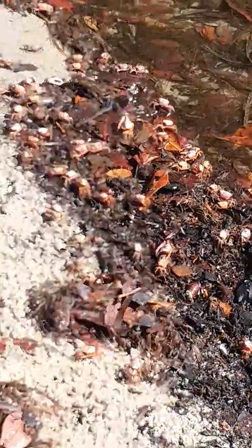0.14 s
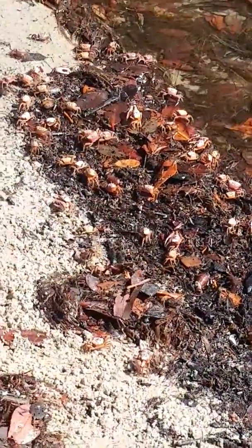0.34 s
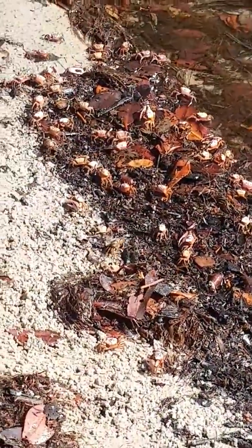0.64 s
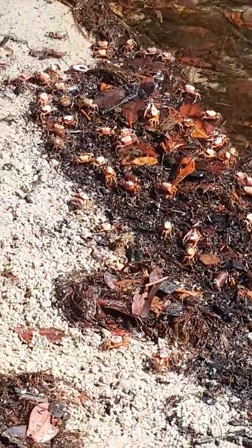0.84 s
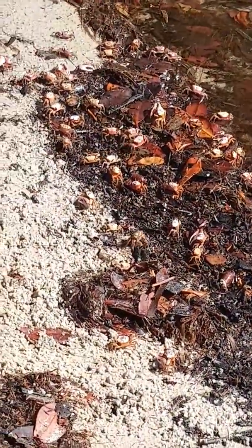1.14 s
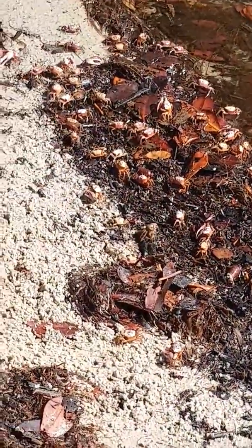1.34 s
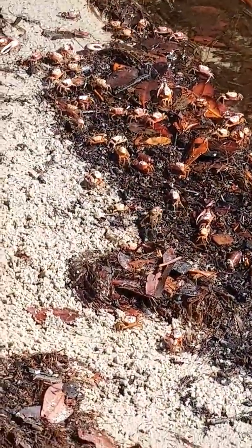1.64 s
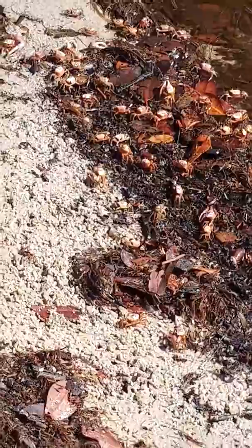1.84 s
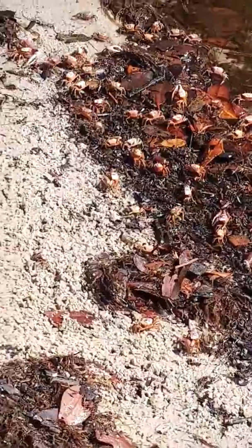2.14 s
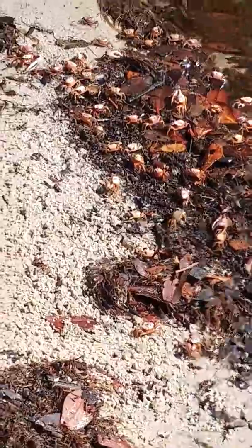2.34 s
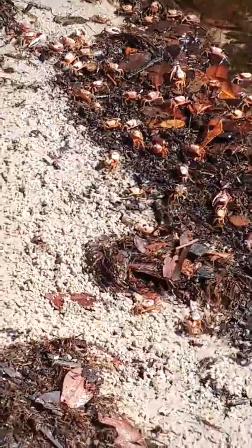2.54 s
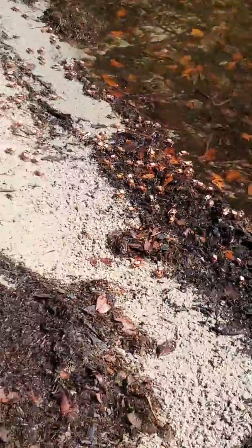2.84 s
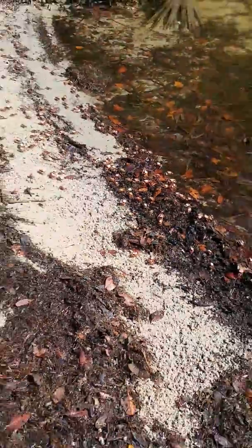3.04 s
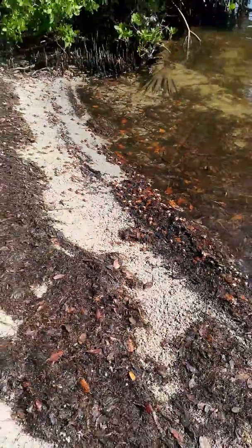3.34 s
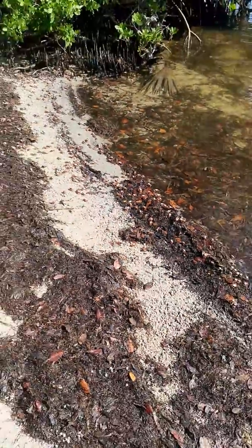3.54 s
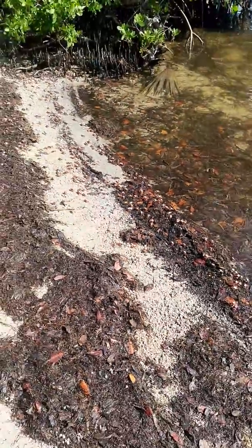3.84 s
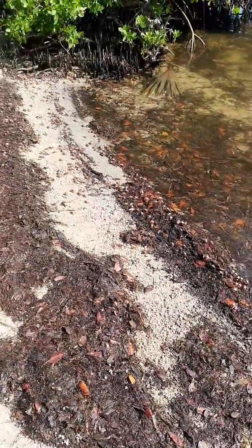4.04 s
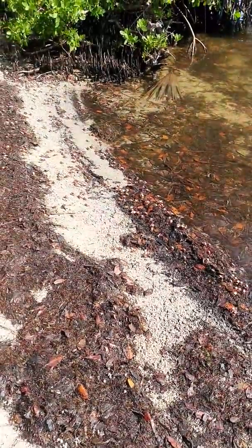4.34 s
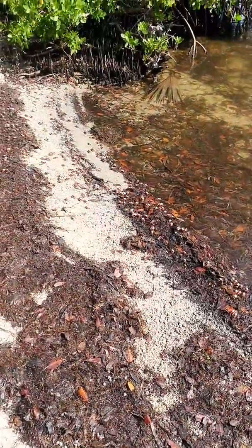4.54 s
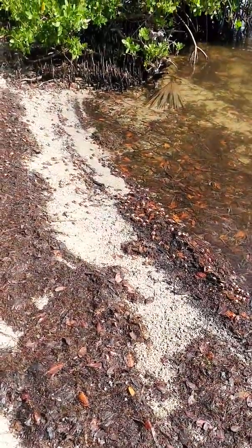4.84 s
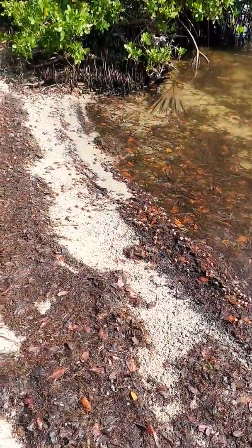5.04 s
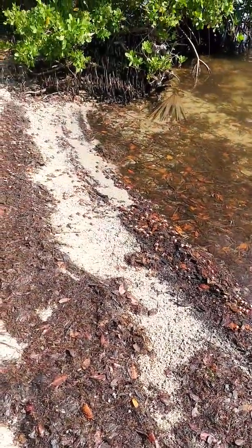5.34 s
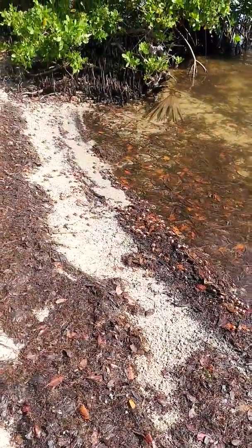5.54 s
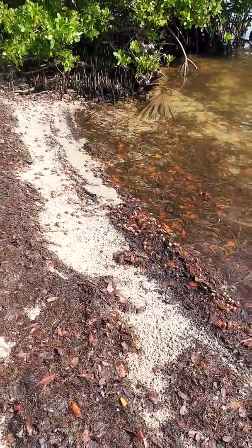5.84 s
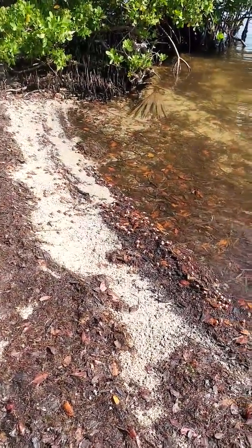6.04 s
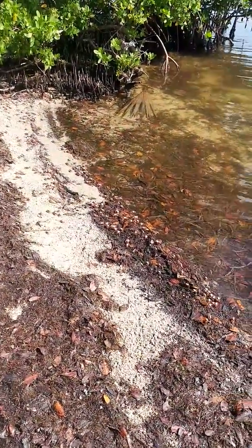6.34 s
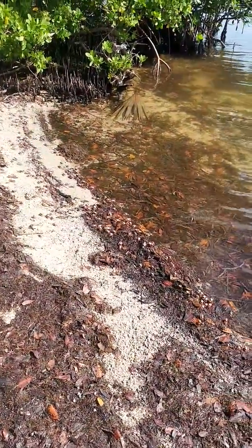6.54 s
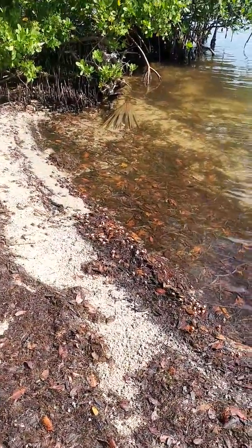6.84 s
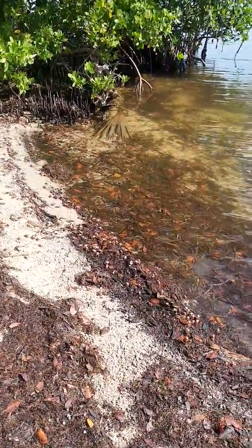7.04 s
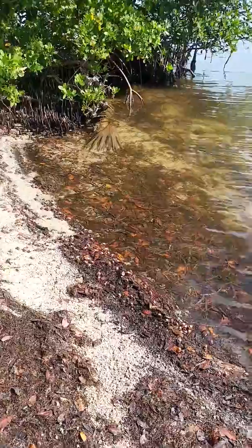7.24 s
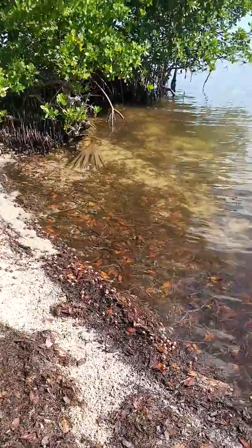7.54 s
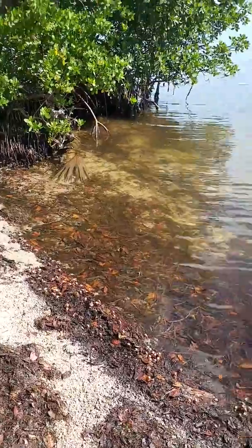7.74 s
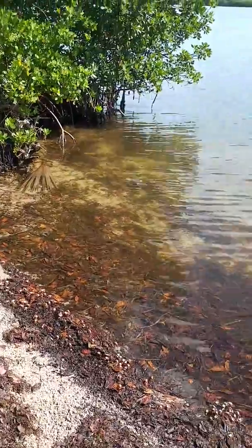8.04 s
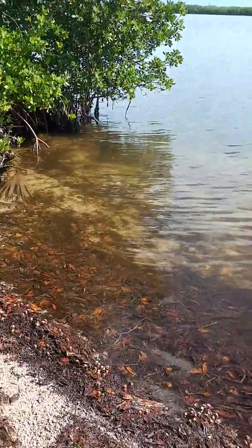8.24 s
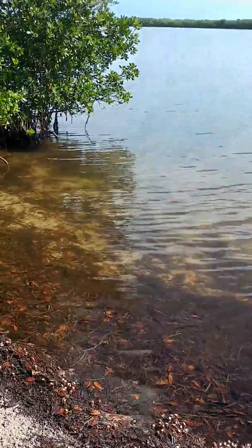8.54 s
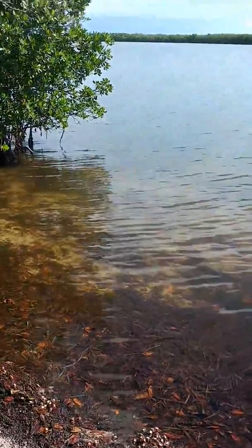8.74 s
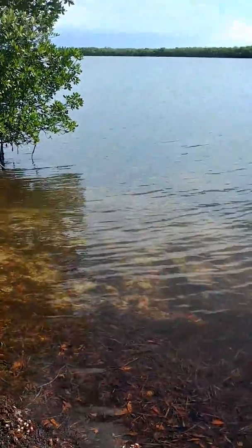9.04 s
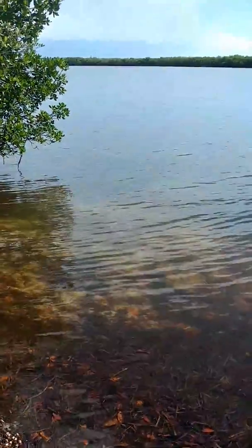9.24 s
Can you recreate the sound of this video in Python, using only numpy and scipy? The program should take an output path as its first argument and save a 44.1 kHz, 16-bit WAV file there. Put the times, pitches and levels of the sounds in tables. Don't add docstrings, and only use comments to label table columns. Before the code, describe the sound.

On a mangrove shore beside a calm lagoon, a hand-held phone picks up continuous shrill cicada song for about 9.4 seconds. The closest singer makes a dense, dry buzz of roughly 108 pulses a second, ringing around 8 kHz with a brighter edge near 10 kHz, its tone shifting slightly. Brief dropouts under a tenth of a second come at 3.3, 4.1, 7.1 and 7.9. A second, slower-pulsing cicada and a far crowd blur into hiss behind. Wind slaps the left side at the very start, then buffets both sides until about 2.9, with another thump near 2.1. The middle is calm, with a faint low distant hum. A hard left gust hits at 7.05, and lumpy gusts, stronger on the right, run from 7.6 to the end. Tiny water laps fizz almost inaudibly at 6.9 on the left and 8.4 on the right.

```python
import sys
import numpy as np
from scipy import signal
from scipy.fft import rfft, irfft, next_fast_len
from scipy.io import wavfile
from scipy.ndimage import uniform_filter1d

SR = 44100
rng = np.random.default_rng(int(sys.argv[2]) if len(sys.argv) > 2 else 0)


def wrap_up_sound(samples):
    columns = np.atleast_2d(samples).T
    tamed = np.clip(columns, -1, 1)
    steps = np.round(tamed * 32767).astype(np.int16)
    wavfile.write(sys.argv[1], SR, steps)


def boost_factor(decibels):
    exponent = np.asarray(decibels, float) / 20
    return 10 ** exponent


N = 413658


def evened(x):
    return x / np.sqrt(np.mean(x ** 2) + 1e-20)


def curves(rows):
    s, *columns = np.transpose(rows)
    return [np.interp(np.arange(N) / SR, s, column) for column in columns]


def read(points, hz, axis=1):
    table = np.transpose(points)
    return np.interp(np.log(hz + 1), np.log(table[0] + 1), table[axis])


def drift(rate_hz, count=1):
    t = np.arange(0, N + 64, 64) / SR
    hz = np.geomspace(rate_hz / 12, rate_hz, 16)
    phase_turns = hz[:, None] * t + rng.random((count, 16, 1))
    slow = np.sin(2 * np.pi * phase_turns).sum(1) / np.sqrt(8)
    return np.array([np.interp(np.arange(N) / SR, t, row) for row in slow])


def coloured(x, db_of):
    size = next_fast_len(N + 4096)
    gain = boost_factor(db_of(np.fft.rfftfreq(size, 1 / SR)))
    return irfft(rfft(x, size) * gain, size)[..., :N]


def resonate(x, hz, width_hz):
    turn = np.exp(2j * np.pi * np.cumsum(hz) / SR)
    r = np.exp(-np.pi * width_hz / SR)
    return 2 * (turn * signal.lfilter([1 - r], [1, -r], x / turn)).real


def noise(db_of, same_of, patchy_db, size, count):
    frames, hz = 4 * N // size + 5, np.fft.rfftfreq(size, 1 / SR)
    a, b, c, d, patches = rng.standard_normal((frames, len(hz), 5)).T
    patches = uniform_filter1d(patches, size=10, axis=0)
    patches = evened(uniform_filter1d(patches, size=count, axis=1))
    same = np.clip(same_of(hz), -1, 1)[:, None]
    left = a + 1j * b
    right = same * left + np.sqrt(1 - same ** 2) * (c + 1j * d)
    z = np.array([left, right]) * boost_factor(db_of(hz)[..., None] + patchy_db * patches)
    return signal.istft(z, nperseg=size, noverlap=3 * size // 4)[1][:, :N]


def ribs(cycle, pattern, lead, jitter_s, spread_db, wander_db):
    cycle_jitter_s = 3.5e-5
    starts = np.flatnonzero(np.diff(np.floor(np.cumsum(curves(cycle)[0]) / SR)))
    ms, db = np.transpose(pattern)
    chance = rng.standard_normal((len(starts), len(ms), 2))
    delay_s = ms / 1000 + jitter_s * chance[..., 0] + cycle_jitter_s * chance[:, -1:, 1]
    at = starts[:, None] + delay_s * SR
    at = np.clip(np.round(at).astype(int), 0, N - 1)
    led_db = db * lead[starts, None]
    wander = wander_db * drift(2.8, count=len(ms))[:, starts].T
    size = boost_factor(led_db + spread_db * chance[..., 1] + wander)
    size /= np.linalg.norm(boost_factor(led_db), axis=1, keepdims=True)
    return evened(np.bincount(at.ravel(), size.ravel(), N))


def leaves(x, t60_s, wet_db, sway_hz, right_late_ms):
    size, late = 6000, round(right_late_ms * SR / 1000)
    taps = rng.standard_normal((2, 3, size)) * (rng.random((2, 3, size)) < .15)
    taps *= boost_factor(-60 * np.arange(size) / SR / t60_s)
    taps /= np.linalg.norm(taps, axis=2, keepdims=True)
    turn = 2 * np.pi * (sway_hz * np.arange(N) / SR + 0.19 * drift(1.5)[0])
    fed = x * np.sqrt(2 / 3) * np.cos(turn + np.arange(3)[:, None] * np.pi / 3)
    echoes = signal.oaconvolve(fed[None], taps, axes=2).sum(1)[:, :N]
    direct = np.array([x, np.roll(x, late)])
    return (direct + boost_factor(wet_db) * echoes) / np.sqrt(1 + boost_factor(wet_db) ** 2)


def singing(pauses):
    pause_db, stop_s = -43, 0.0036
    t = np.arange(N) / SR
    silent = sum(np.clip(np.minimum(t - s, s + length - t) / stop_s, 0, 1) for s, length in pauses)
    return boost_factor(pause_db * silent)


# hz, left_db, right_db
PORT_COLOUR = [(5000, -65.5, -61), (5338, -52, -45), (6004, -39, -37), (6860, -32.5, -25),
               (7300, -27, -14.5), (7790, -22.5, -10), (8200, -19.5, -10), (8890, -21.5, -22.5),
               (9466, -12.5, -21.5), (10413, -5.5, -20), (10590, -2.5, -26), (11690, -7.5, -23.5),
               (13000, -16.5, -29.5), (15700, -22, -35)]
# hz, near_db, second_db, crowd_db
VOICE_SHARES = [(5100, 0.5, -26.5, 4.5), (7900, 1.5, -23.5, -12.5), (7900, 2.5, -31, -15),
                (10310, 1, -7, -2.5), (12000, -6, -5.5, -4), (15000, -8, -12, -5.5)]


def at_ports(voice):
    def db_of(hz):
        skirt_db = np.clip((hz - 4900) * 0.052, -60, 0)
        ports_db = np.array([read(PORT_COLOUR, hz, axis=1), read(PORT_COLOUR, hz, axis=2)])
        return ports_db + read(VOICE_SHARES, hz, axis=voice) + skirt_db
    return db_of


# start_s, effort_db, body_hz, lead_0_to_1 (first ribs dominate, leaves blur less)
NEAR_SONG = [(0, -36, 8000, 0.33), (0.3, -40, 8020, 0.43), (1, -37.5, 8010, 0.17), (1.55, -34, 8000, 0.13),
             (1.85, -35, 7980, 0.15), (3.0, -34.5, 7880, 0.1), (3.6, -35, 8020, 0.037),
             (3.95, -37.2, 7940, 0.053), (4.5, -36.5, 7600, 0.15), (5.0, -36, 7970, 0.053),
             (5.9, -36.5, 7900, 0.21), (6.3, -34.5, 7660, 0.43), (6.8, -32.5, 7780, 0.14),
             (7.3, -37.5, 7780, 0.6), (7.6, -34, 7660, 0.34), (8.6, -34.5, 8100, 0.45),
             (9.0, -32, 8000, 0.62), (9.38, -36, 7840, 0.16)]
# start_s, cycle_hz
NEAR_CYCLE_HZ = [(0, 108.5), (5, 108.4), (9.38, 107.8)]
# delay_ms, level_db
NEAR_RIB_CLICKS = [(0, -4), (0.75, -4.5), (2.1, -3.7), (2.85, -5), (5.401, -18), (7.301, -14)]
# start_s, length_s
NEAR_BREAKS = [
    (3.287, .043),
    (4.137, 0.093),
    (7.115, .078),
    (7.945, 0.068),
]


def near_cicada():
    effort_db, body_hz, lead = curves(NEAR_SONG)
    clicks = ribs(NEAR_CYCLE_HZ, NEAR_RIB_CLICKS, 7.0 * lead, jitter_s=1.7e-5, spread_db=1.1, wander_db=1.45)
    body = 0.56 * clicks + 1.63 * resonate(clicks, body_hz, width_hz=410)
    song = body * boost_factor(effort_db + 22.5) * singing(NEAR_BREAKS)
    scattered = leaves(song, t60_s=0.13, wet_db=1.5 - 24 * lead, sway_hz=0.307, right_late_ms=.7)
    facing_db = 1.2 * (effort_db + 34.5)
    return coloured(scattered, at_ports(1)) * boost_factor(np.outer([-.5, .5], facing_db))


# start_s, cycle_hz
SECOND_CYCLE_HZ = [(0, 98.25), (9.38, 97.95)]
# delay_ms, level_db
SECOND_RIB_CLICKS = [(0, -8), (1.2, -10.5), (2.549, -4), (3.902, -10.5), (5.201, -6), (7.7, -5),
                     (8.899, -3)]
# start_s, length_s
SECOND_BREAKS = [
    (1.02, 0.078),
    (7.58, 0.041),
]
# start_s, level_db
CROWD_LEVEL = [
    (0.0, -29),
    (1.85, -27.5),
    (4.07, -29),
    (7.11, -28.5),
    (7.13, -30.5),
    (7.29, -29.5),
    (9.38, -29.5),
]


def other_cicadas():
    clicks = ribs(SECOND_CYCLE_HZ, SECOND_RIB_CLICKS, np.ones(N), jitter_s=4e-5, spread_db=2.5, wander_db=3.0)
    song = clicks * singing(SECOND_BREAKS)
    scattered = leaves(song, t60_s=0.16, wet_db=3.5, sway_hz=0.405, right_late_ms=.3)
    second = coloured(scattered, at_ports(2))
    white = evened(noise(np.zeros_like, lambda hz: 0.08 + 0 * hz, patchy_db=1.6, size=1024, count=110))
    crowd = coloured(white, at_ports(3))
    return boost_factor(curves(CROWD_LEVEL)[0] + 21.5) * (boost_factor(4.5) * second + crowd)


# hz, level_db
HUM_SPECTRUM = [(18, -61), (30, -29), (56, 0), (71, -1.5), (163, -7.5), (185, -12.5), (290, -13),
                (316, -19), (540, -3.5), (942, -17), (1410, -26), (4690, -29.5), (5000, -22.5),
                (6500, -31.5), (11000, -120)]
# hz, likeness_0_to_1
HUM_LIKENESS = [(100, 0.9), (500, 0.76), (900, 0.54), (1500, 0.069), (4000, 0.057)]


def hum():
    level_db = -66.5 + 2.0 + np.array([[.6], [-.6]])
    wash = noise(lambda hz: read(HUM_SPECTRUM, hz), lambda hz: read(HUM_LIKENESS, hz),
                 patchy_db=2.36, size=2048, count=16)
    return boost_factor(level_db) * evened(wash)


def gusts(rows):
    skirt, lag = 2.13, 1.24
    t = np.arange(0, N + 64, 64) / SR
    s, db, width_s = np.transpose(rows)[..., None]
    off = 2 * (t - s) / width_s / np.where(t > s, lag, 1)
    power = (boost_factor(2 * db) / (1 + off ** 2) ** skirt).sum(0)
    return np.interp(np.arange(N) / SR, t, 10 * np.log10(power))


# peak_s, peak_db, width_s
LEFT_GUSTS = [(0.032, -29, 0.053), (0.084, -30.5, 0.066), (0.333, -41, 0.045), (0.503, -40.9, 0.072),
              (0.617, -37.5, 0.084), (0.769, -43.5, 0.056), (0.914, -36.5, 0.028), (0.995, -45.5, 0.033),
              (1.696, -50.5, 0.051), (1.923, -41, 0.05), (2.098, -29.5, 0.02), (2.317, -33, 0.047),
              (2.383, -41.5, 0.044), (2.542, -45.5, 0.051), (2.639, -49.5, 0.075), (2.866, -48.5, 0.041),
              (3.46, -50.5, 0.03), (6.78, -53, 0.06), (6.957, -54, 0.041), (7.045, -29.5, 0.089),
              (7.19, -41.5, 0.065), (7.726, -45, 0.047), (8.025, -41.5, 0.09), (8.14, -32, 0.036),
              (8.206, -31.5, 0.098), (8.515, -39, 0.065), (8.621, -46, 0.041), (8.694, -46, 0.094),
              (9.029, -48, 0.19), (9.336, -38, 0.068)]
# peak_s, peak_db, width_s
RIGHT_GUSTS = [(0.159, -38, 0.074), (0.234, -33, 0.025), (0.279, -35.5, 0.06), (0.354, -35.5, 0.046),
               (0.492, -39.5, 0.044), (0.583, -46.1, 0.075), (0.907, -48, 0.05), (1.0, -55, 0.05),
               (2.009, -56.2, 0.11), (2.274, -51, 0.054), (2.327, -43, 0.079), (2.558, -53, 0.082),
               (2.642, -60, 0.053), (7.161, -64, 0.098), (7.56, -45.5, 0.12), (7.603, -46, 0.037),
               (7.712, -37.5, 0.033), (7.825, -51.1, 0.042), (7.937, -33.5, 0.035), (8.032, -39.5, 0.071),
               (8.138, -27, 0.042), (8.281, -35.5, 0.074), (8.37, -37.8, 0.081), (8.51, -33.5, 0.054),
               (8.59, -53, 0.066), (8.73, -30.5, 0.061), (8.859, -36, 0.081), (8.973, -38.5, 0.045),
               (9.048, -42.5, 0.057), (9.306, -30.5, 0.076)]
# hz, level_db
WIND_SPECTRUM = [(15, -40), (25, -12), (65, 7), (139, -4.5), (217, -12), (344, -26), (552, -30), (700, -36),
                 (910, -53), (1540, -120)]


def wind():
    port_db = np.array([gusts(LEFT_GUSTS), gusts(RIGHT_GUSTS)]) + 2.08
    lumps = boost_factor(2.25 * drift(45., count=2))
    raw = rng.standard_normal((2, N))
    low = evened(coloured(raw, lambda hz: read(WIND_SPECTRUM, hz) - np.maximum(hz - 120, 0) * 0.099))
    high = evened(coloured(raw, lambda hz: read(WIND_SPECTRUM, hz) - np.maximum(180 - hz, 0) * 0.15))
    reach = boost_factor(-6.0 + 1.18 * np.clip(port_db + 29.5, -30, 6))
    gate = np.clip((port_db + 77.0) / 6, 0, 1)
    return boost_factor(port_db - 3.0) * gate * lumps * (low + reach * high)


# start_s, peak_db, left_over_right_db, length_ms
EDDIES = [(0.027, -35, 32, 3.5), (0.033, -26.5, 33, 3), (0.076, -32, 20, 5.1), (0.228, -43.5, -15, 4.2),
          (2.092, -61, 7.0, 5.5), (2.297, -68, 5.5, 3.8), (7.039, -47, 23.0, 3.2), (7.055, -28.5, 39, 3.5),
          (7.085, -44, 20, 4.3), (7.104, -45, 15, 4.4), (7.935, -55, -13, 3.1), (8.122, -44.5, -11, 4.5),
          (8.194, -46, -11, 3.5), (8.717, -50, -9, 4.5), (8.853, -55, -15, 4.0), (8.879, -51, -12, 4.0),
          (9.294, -42, -20, 2.8), (9.308, -32, -22, 2.8), (9.339, -44, -14, 4.7)]


def slaps():
    out = np.zeros((2, N))
    t = np.arange(-600, 600) / SR
    for (s, db, pan_db, ms), turn in zip(EDDIES, rng.random(len(EDDIES))):
        envelope = np.exp(-(t / (ms / 2500)) ** 2)
        swing = envelope * np.cos(2 * np.pi * (400 * t + 9000 * t * abs(t) + turn))
        share = np.sqrt(1 / (1 + boost_factor(np.array([-pan_db, pan_db])) ** 2))
        at = round((s + 0.00378) * SR) - 600
        out[:, at:at + len(t)] += boost_factor(db + 7) * share[:, None] * swing
    return out


# start_s, peak_db, pitch_hz, width_hz, left_over_right_db
WATER_LAPS = [
    (6.871, -64, 2040, 550, 5),
    (8.359, -64, 1830, 300, -8),
]


def laps():
    out, t = np.zeros((2, N)), np.arange(2000) / SR
    for s, db, hz, width_hz, pan_db in WATER_LAPS:
        fizz = rng.standard_normal(len(t))
        for _ in range(2):
            fizz = resonate(fizz, hz + 0 * t, width_hz)
        burst = evened(fizz) * (1 - np.exp(-t / 0.0043)) * np.exp(-t / 0.015)
        at = round(s * SR)
        out[:, at:at + len(t)] += boost_factor(db + np.array([[.5], [-.5]]) * pan_db) * burst
    return out


def scene():
    return near_cicada() + other_cicadas() + hum() + wind() + slaps() + laps()


# hz, threshold_db
MASKING = [(2000, -35.5), (2800, -0.5), (4500, -4.5), (5200, 1.55), (6400, 2), (6900, -3.5), (7300, -15)]


def thinned(x):
    top_hz, top_db = 14100, -86
    mask_shift = [[1.056], [1]]
    hz, _, z = signal.stft(x, SR, nperseg=2048)
    power = abs(z) ** 2
    steady = uniform_filter1d(uniform_filter1d(power, size=4, axis=2), size=3, axis=1)
    local = uniform_filter1d(uniform_filter1d(power, size=36, axis=1), size=15, axis=2)
    threshold = boost_factor(read(MASKING, hz / mask_shift))[..., None] ** 2
    kept = z * (steady > local * threshold)
    band = uniform_filter1d(power, size=16, axis=1)[:, 8::16].repeat(16, axis=1)
    band = np.pad(band, ((0, 0), (0, 1), (0, 0)))
    kept *= (hz[:, None] < top_hz) | (band > boost_factor(top_db) ** 2)
    return signal.istft(kept, SR, nperseg=2048)[1][:, :N]


def low_pass(x):
    return signal.sosfilt(signal.butter(12, 15900, fs=SR, output="sos"), x)


def record(dry):
    low_cut = signal.butter(3, 45, "highpass", fs=SR, output="sos")
    cut = signal.sosfilt(low_cut, dry)
    mix = thinned(cut * signal.windows.tukey(N, .0002))
    return low_pass(mix)


dry = scene()
out = record(dry)
wrap_up_sound(out)
```